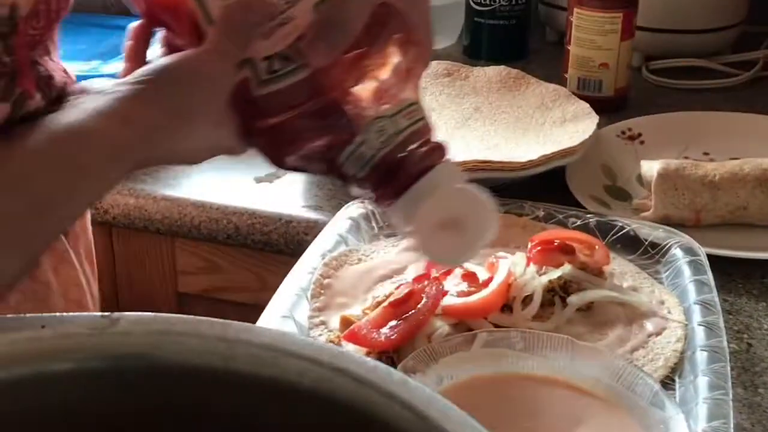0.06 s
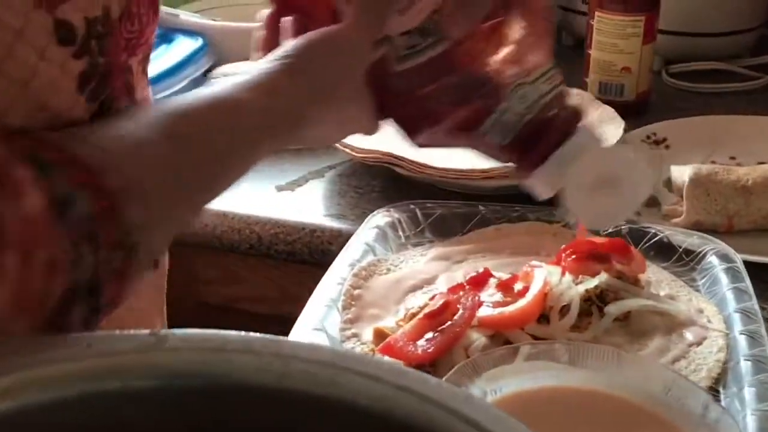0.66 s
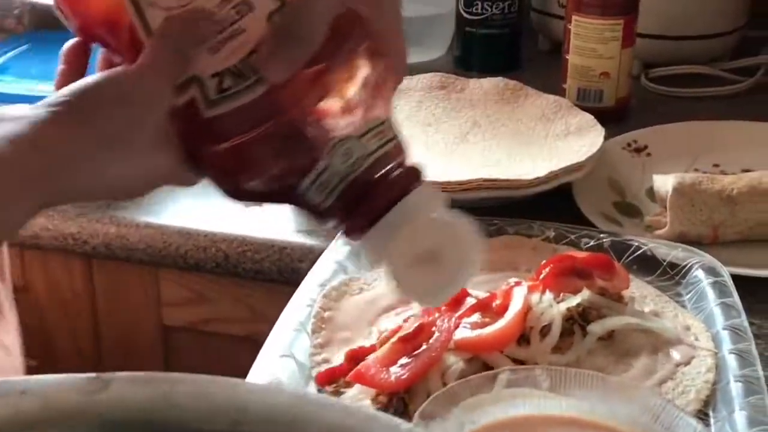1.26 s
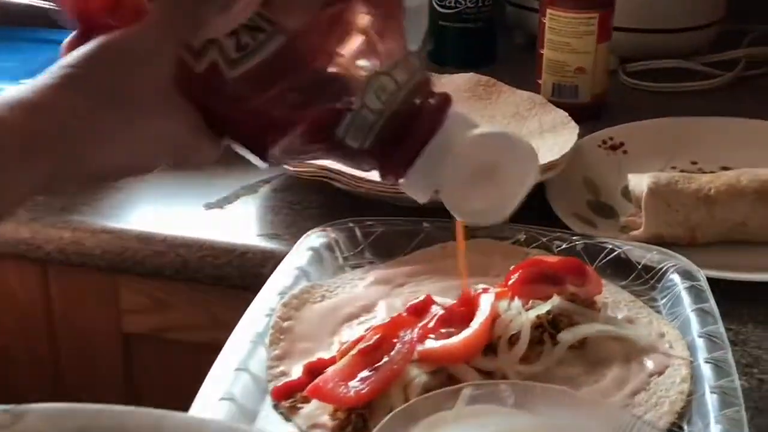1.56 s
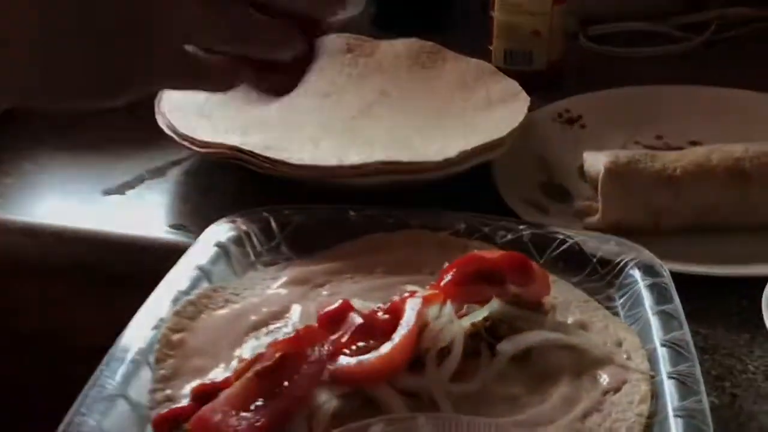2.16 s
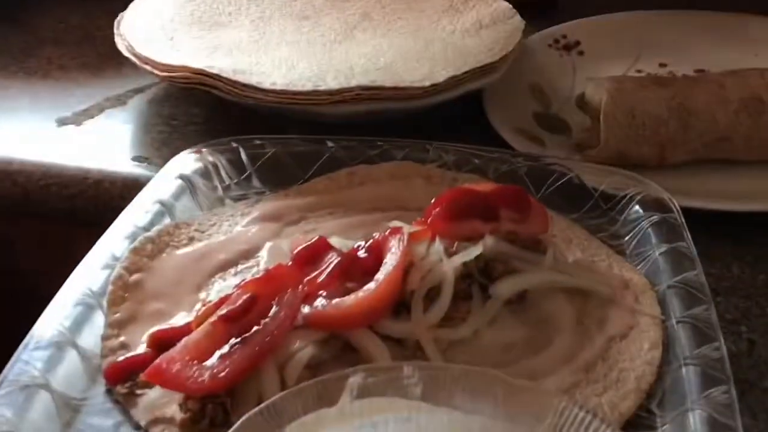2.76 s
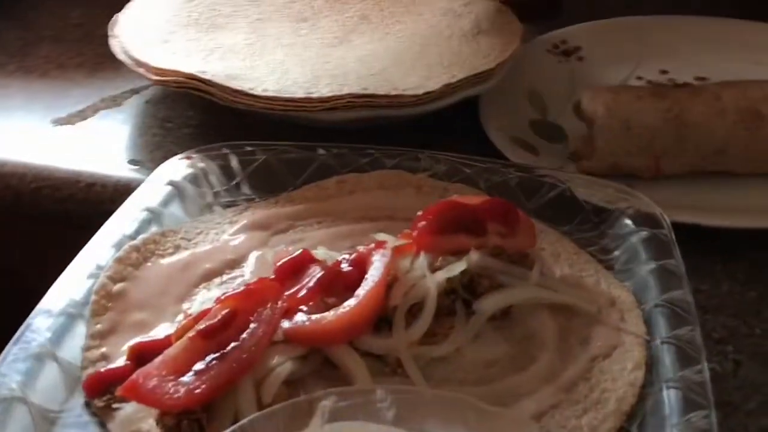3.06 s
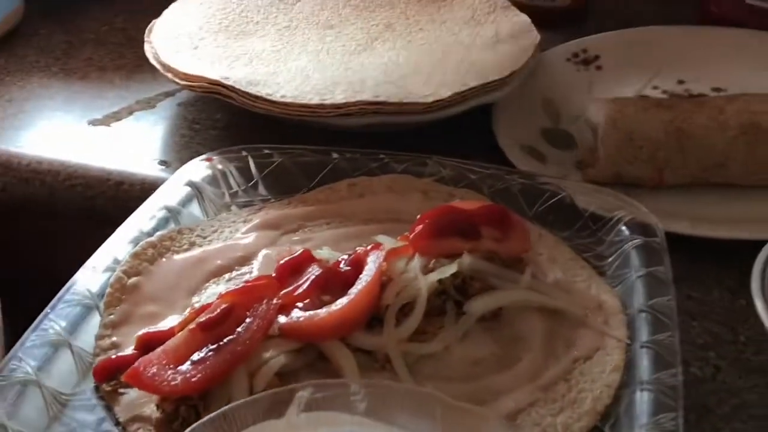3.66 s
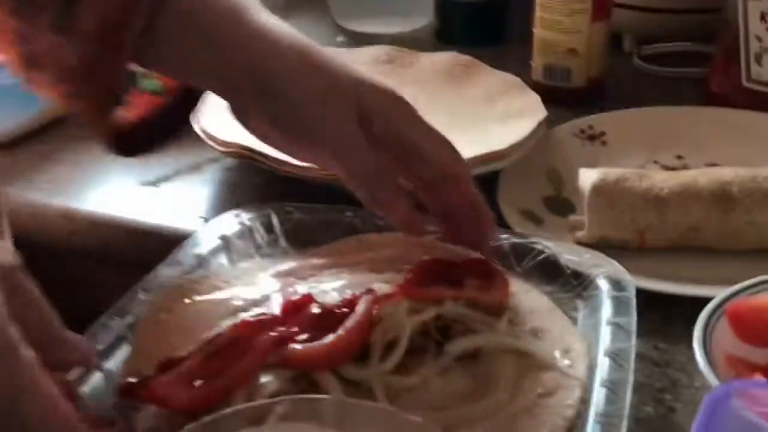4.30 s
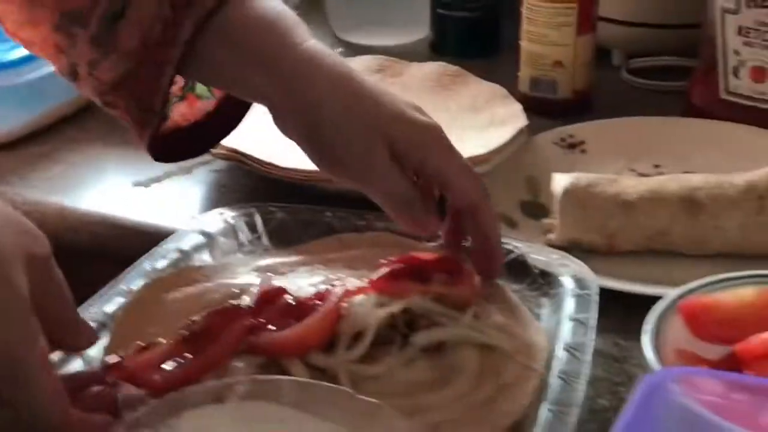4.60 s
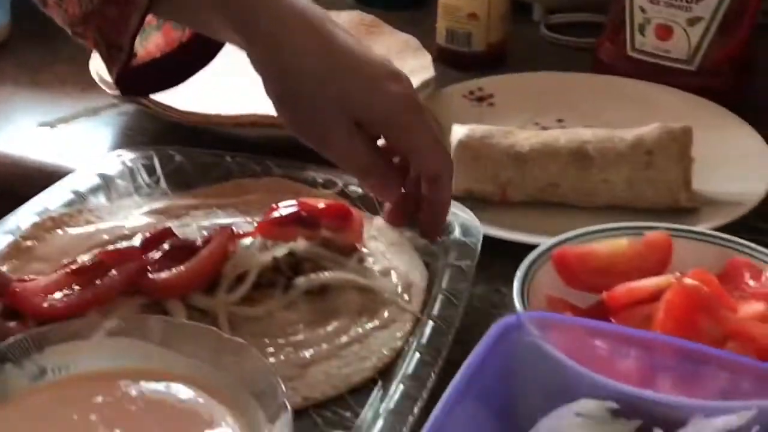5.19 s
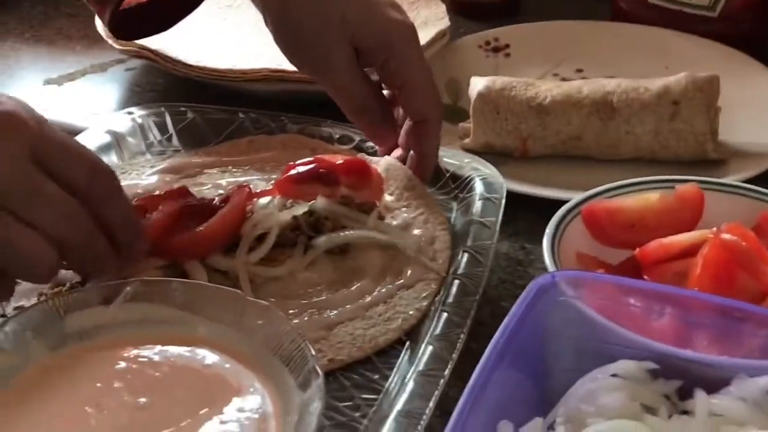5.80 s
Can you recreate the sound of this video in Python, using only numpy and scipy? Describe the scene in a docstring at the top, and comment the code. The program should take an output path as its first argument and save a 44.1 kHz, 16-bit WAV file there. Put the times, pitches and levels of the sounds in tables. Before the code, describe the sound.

Close up at a kitchen counter, an appliance hums steadily with a low rush of air. A plastic bottle squirts sauce twice, very softly, among faint clicks. The bottle is then set down with a loud, deep thump and rocks, its rim knocking as crockery clinks lightly. Afterwards fingers tap and rub on a tortilla in a thin plastic tray, and plastic snaps once, sharply.

```python
"""A kitchen counter, close up, over an appliance's motor hum and rush of air. A plastic bottle
squirts sauce twice, softly, with a faint low bump between. It is set down and rocks: the counter
booms, the rim slaps, nudged crockery clinks. Plastic clicks in the room and snaps once, hard.
Fingers tick, tap and rub on a tortilla in a thin plastic tray."""
import sys
import numpy as np
from scipy import signal
from scipy.fft import rfft, irfft
from scipy.io import wavfile
from scipy.ndimage import uniform_filter1d

SR = 44100
rng = np.random.default_rng(int(sys.argv[2]) if len(sys.argv) > 2 else 0)


def transcribe(signal):
    """Save signal, clipped to [-1, 1], as a 16-bit WAV file at the path in sys.argv[1]."""
    frames = np.atleast_2d(signal).T
    limited = np.clip(frames, -1, 1)
    pcm = np.round(limited * 32767).astype(np.int16)
    wavfile.write(sys.argv[1], SR, pcm)


N = 262174
TIME_S = np.arange(N) / SR
RING_S = TIME_S[:SR // 2]
BINS_HZ = np.maximum(np.fft.rfftfreq(len(RING_S), 1 / SR), 1)

# motor lines: (frequency [Hz], level [dB])
HUM_LINES = [(113, -66), (166.9, -64.5), (237, -75.5), (279.9, -75), (333.6, -59)]
# hum envelope: (time [s], gain [dB])
HUM_GAIN = [(0, -4), (1.2, -3), (3, 2.5), (4, 0), (5.94, 1.5)]
# appliance air: (frequency [Hz], gain [dB])
AIR_SPECTRUM = [(25, -4), (40, -2.5), (60, 10.5), (85, -6.5), (140, 2.5), (220, -12.5), (330, -8.5),
                (500, -15), (1000, -18.5), (2000, -26), (4000, -29), (8000, -35), (10300, -37),
                (15500, -37)]

# plastic clicks: (time [s], level [dB])
CLICKS = [(0.028, -56.5), (0.1351, -46), (0.832, -54.5), (0.98, -47.5), (1.719, -47.5), (1.984, -54.5),
          (2.096, -53.5), (3.72, -48.5), (4.303, -50.5), (4.325, -49), (5.242, -54), (5.7123, -44.5),
          (5.737, -55)]
# clicking plastic: (frequency [Hz], gain [dB])
CLICK_SPECTRUM = [(300, -14.5), (650, 2.5), (950, -4.5), (1300, -2.5), (1800, -5), (2600, 3.5), (3800, -4),
                  (7000, -4.5), (10300, -11), (12500, -8.5), (16000, -22.5)]
# its resonances: (frequency [Hz], width [Hz], lift [dB])
CLICK_PEAKS = [(984, 79, 11), (1190, 31, 4.5), (1860, 120, 3), (2457, 77, 1.5), (3490, 26, -2),
               (4177, 37, 11.5), (7500, 78, -33)]

# hands slip on bottle, tray and tortilla: (time [s], level [dB], centre [Hz], length [s])
RUBS = [(0.138, -76, 5650, 0.28), (1.254, -74, 1775, 0.1), (2.143, -69, 2300, 0.081),
        (4.022, -74.5, 6360, 0.31), (4.47, -69.5, 3420, 0.39), (5.773, -77, 3260, 0.13)]
# dull low bumps, and the counter's rumble after the bottle lands: (time [s], level [dB], length [s])
BUMPS = [(.25, -54.5, 0.064), (0.458, -54, 0.14), (1.04, -52.5, 0.087), (3.481, -50.5, 0.18),
         (4.299, -53.5, 0.27), (5.2, -57, 0.11)]
# sauce squirts: (time [s], length [s], hiss [dB], whistle [dB], whistle start [Hz], whistle end [Hz])
SQUIRTS = [(.46, .25, -78.5, -80, 3500, 3250), (1.555, .175, -73.5, -72, 5200, 3100)]
# nozzle and tray ticks: (time [s], level [dB], centre [Hz])
TICKS = [(.744, -62, 13500), (.798, -65, 13600), (1.3011, -67, 13000), (1.6416, -55.5, 3700),
         (5.062, -58.5, 3500), (5.4491, -53, 4100)]

# low thumps, a faint bump and then the bottle landing and rocking:
# (time [s], level [dB], pitch [ratio], first rebound [dB re thump])
THUMPS = [(1.02, -33, 1.22, 1), (3.1168, -1, 1.104, -4.5), (3.3708, -17.5, 0.834, -8),
          (3.4488, -10, 1.175, 3)]
# counter with full bottle: (frequency [Hz], gain [dB], t60 [s])
COUNTER_MODES = [(42.3, -31, 0.84), (127.4, 0, 0.11), (184, -19.5, 0.15), (231, -33, 0.19),
                 (309.4, -17.5, 0.038)]

# fingers on the tray: (time [s], level [dB], tilt [dB/octave])
TAPS = [(3.042, -50.5, -12.5), (4.1466, -50, 6), (4.4275, -44, 0), (4.9258, -39, 0)]
# thin tray: (frequency [Hz], gain [dB])
TRAY_SPECTRUM = [(200, -5.5), (500, -4.5), (1000, 1), (1500, 2.5), (2000, -4), (4200, -4.5), (5200, -13.5),
                 (8000, -18.5), (16000, -33)]
# its resonances: (frequency [Hz], width [Hz], lift [dB])
TRAY_PEAKS = [(1300, 130, 0), (1640, 93, 0.5), (2400, 81, -7), (3860, 84, 6)]

# bottle rim on the counter: (time [s], level [dB], tilt [dB/octave])
KNOCKS = [(3.1145, -35, -5.5), (3.1245, -32.5, -2), (3.141, -39, 0), (3.1675, -39.5, -1.5),
          (3.372, -37, -2), (3.4495, -29.5, -9.5), (3.464, -41, 0), (3.4855, -40.5, -4.5), (3.5, -44.5, 2)]
# knocked bottle: (frequency [Hz], gain [dB])
BOTTLE_SPECTRUM = [(120, -26), (310, 3), (470, -4.5), (680, -7), (980, -1.5), (1300, -5.5), (1800, -9),
                   (3500, -12.5), (6500, -14), (9500, -19.5), (12500, -22), (16000, -32)]
# its resonances: (frequency [Hz], width [Hz], lift [dB])
BOTTLE_PEAKS = [(490, 144, -5), (1040, 150, 0), (1830, 90, 1.5), (3480, 180, 5), (3990, 110, 6.5),
                (6800, 70, 8)]

# crockery nudges: (time [s], level [dB], pitch [ratio])
CLINKS = [(3.3717, -45, 1.0), (3.5, -46.5, .87)]
# crockery ring: (frequency [Hz], gain [dB], t60 [s])
CROCKERY_MODES = [(3360, -18, 0.071), (4086, 4, 0.031), (4996, -32, 0.22), (6460, -21, 0.075),
                  (6420, 4, 0.017), (6960, -15, 0.087), (8000, -8, 0.09), (12500, -27, .08)]

# snap and recoil: (time [s], level [dB], tilt [dB/octave])
SNAPS = [(5.624, -35.5, 0), (5.6295, -39.5, 1)]
# snapping plastic: (frequency [Hz], gain [dB])
SNAP_SPECTRUM = [(500, -10), (1000, -13), (2200, -9.5), (2700, 4), (4000, -7), (6600, -0.5), (8200, -12),
                 (12500, -8), (16000, -30)]
# its resonances: (frequency [Hz], width [Hz], lift [dB])
SNAP_PEAKS = [(2720, 300, 5.5), (3550, 53, 2), (5070, 52, 10), (6580, 150, 8.5), (8750, 120, 12)]

# room decay: (frequency [Hz], t60 [s])
ROOM_T60 = [(150, 1), (600, 0.18), (1400, 0.42), (3500, 0.2), (9000, 0.17), (16000, 0.11)]


def undb(db):
    """Decibels to gain."""
    return 10 ** (np.asarray(db) / 20)


def unit(x):
    """Scale to rms 1."""
    return x / np.sqrt(np.mean(x ** 2))


def at_hz(points, hz):
    """Interpolate (frequency [Hz], value) points on a log axis."""
    points_hz, values = np.transpose(points)
    return np.interp(np.log(hz), np.log(points_hz), values)


def add(out, time_s, x):
    """Mix x in at time_s."""
    i = max(int(time_s * SR), 0)
    out[i:i + len(x)] += x[:max(N - i, 0)]


def fade(t60_s):
    """Exponential decay."""
    return np.exp(-np.log(1000) * RING_S / t60_s)


def walk(rate_hz):
    """Smooth random drift, rms 1."""
    hold = int(SR / rate_hz)
    steps = np.repeat(rng.standard_normal(N)[:N // hold + 1], hold)
    return unit(uniform_filter1d(steps, hold)[:N])


def colour(x, gain_db):
    """Minimum-phase filter, one gain per bin of BINS_HZ."""
    cepstrum = irfft(np.log(undb(gain_db)), len(x))
    cepstrum[1:len(x) // 2] *= 2
    cepstrum[len(x) // 2 + 1:] = 0
    return irfft(rfft(x) * np.exp(rfft(cepstrum)), len(x))


def crack(shape_db, t60_s, edge, rise_s, split_hz=6000, treble_t60_ratio=0.62):
    """Sharp contact, then a dense, short ring; treble dies first."""
    noise = rng.standard_normal(len(RING_S))
    low = irfft(rfft(noise) / (1 + (BINS_HZ / split_hz) ** 4), len(RING_S))
    push = low * fade(t60_s) + (noise - low) * fade(t60_s * treble_t60_ratio)
    push *= 1 - np.exp(-RING_S / rise_s)
    push[0] += edge * np.linalg.norm(push)  # contact impulse
    ring = colour(push, shape_db)
    return ring * np.linalg.norm(fade(t60_s)) / np.linalg.norm(ring)


def blows(events, spectrum, peaks, t60_s, edge, rise_s, patchy_db):
    """Blows on one body; each blow tilts the spectrum its own way, each spot favours other small modes."""
    body = undb(at_hz(spectrum, BINS_HZ))
    for hz, width_hz, lift_db in peaks:
        body *= 1 + (undb(lift_db) - 1) / (1 + (2 * (BINS_HZ - hz) / width_hz) ** 2)
    out = np.zeros(N)
    for time_s, db, tilt_db_per_oct in events:
        spot = unit(signal.fftconvolve(rng.standard_normal(len(BINS_HZ)), np.hanning(140), "same"))
        spot_db = patchy_db * spot * np.minimum(BINS_HZ / 1000, 1)
        tilt_db = tilt_db_per_oct * np.log2(1 + BINS_HZ / 800)
        shape_db = 20 * np.log10(body) + tilt_db + spot_db
        add(out, time_s, undb(db) * crack(shape_db, t60_s, edge, rise_s))
    return out


def struck(events, modes, rise_s):
    """One set of modes, pitched per blow; soft contact builds them slowly."""
    out = np.zeros(N)
    onset = 1 - np.exp(-(RING_S / rise_s) ** 2)
    for time_s, level_db, pitch in events:
        ring = sum(undb(db) * fade(t60_s) * np.sin(2 * np.pi * hz * pitch * RING_S)
                   for hz, db, t60_s in modes)
        add(out, time_s, undb(level_db) * ring * onset)
    return out


def swell(centre_hz, width_oct, length_s, grain_db):
    """Grainy noise band that rises and dies away, rms 1."""
    n = int(length_s * SR)
    grains = (rng.standard_normal(N) * undb(grain_db * walk(250)))[:n]
    hz = np.maximum(np.fft.rfftfreq(n, 1 / SR), 1)
    band = np.exp(-(np.log2(hz / centre_hz) / width_oct) ** 2 / 2)
    return unit(irfft(rfft(grains) * band, n) * np.sqrt(np.hanning(n)))


def appliance(waver_db=2.0, drift=0.00281, air_db=-56, flutter_db=0.63):
    """Wavering motor lines over rushing air, coloured by the room's modes."""
    hum = np.zeros(N)
    for line_hz, db in HUM_LINES:
        amplitude = np.sqrt(2) * undb(db + waver_db * walk(3.33))
        drifting_hz = line_hz * (1 + drift * walk(4.906))
        hum += amplitude * np.sin(2 * np.pi * np.cumsum(drifting_hz) / SR)
    hum *= undb(np.interp(TIME_S, *np.transpose(HUM_GAIN)))
    rush = rng.standard_normal(N)
    rush += undb(-11) * room_echo(rush)
    hz = np.maximum(np.fft.rfftfreq(N, 1 / SR), 1)
    air = unit(irfft(rfft(rush) * undb(at_hz(AIR_SPECTRUM, hz)), N))
    return hum + air * undb(air_db + flutter_db * walk(9.5))


def room_echo(x, build_s=0.011):
    """Diffuse tail of a small hard room; treble dies first."""
    noise = rfft(rng.standard_normal(len(RING_S)))
    edges_hz = np.geomspace(150, 20000, 12)
    tail = np.zeros(len(RING_S))
    for lo_hz, hi_hz in zip(edges_hz, edges_hz[1:]):
        band = irfft(noise * ((BINS_HZ >= lo_hz) & (BINS_HZ < hi_hz)), len(RING_S))
        tail += band * fade(at_hz(ROOM_T60, np.sqrt(lo_hz * hi_hz)))
    tail *= 1 - np.exp(-(RING_S / build_s) ** 2)
    return signal.fftconvolve(x, tail / np.linalg.norm(tail))[:N]


def plastic_clicks(tilt_db_per_oct=1.5):
    """Plastic clicks and rings briefly; like contacts of varying strength."""
    events = [(time_s, db, tilt_db_per_oct) for time_s, db in CLICKS]
    return blows(events, CLICK_SPECTRUM, CLICK_PEAKS,
                 t60_s=0.089, edge=0.023, rise_s=0.0017, patchy_db=1.46)


def cupboards(x, db, count=8):
    """Direct sound plus early reflections off counter and cupboard doors."""
    out = x.copy()
    for lag_s, sign in zip(rng.uniform(.002, .012, count), rng.choice([-1, 1], count)):
        add(out, lag_s, sign * undb(db) * x)
    return out / np.sqrt(1 + count * undb(db) ** 2)


def hand_rubs(width_oct_per_s=1.83):
    """Gritty friction, broader the longer the stroke."""
    out = np.zeros(N)
    for time_s, db, hz, length_s in RUBS:
        add(out, time_s, undb(db) * swell(hz, width_oct_per_s * length_s, length_s, grain_db=3))
    return out


def low_bumps(centre_hz=78, width_oct=0.6):
    """Dull bumps and the counter's rumble, all in one low band."""
    out = np.zeros(N)
    for time_s, db, length_s in BUMPS:
        add(out, time_s, undb(db) * swell(centre_hz, width_oct, length_s, grain_db=2))
    return out


def sauce(flutter_hz=31, waver=.03, chirp=.14, sputter_db=3, hiss_hz=2920, hiss_oct=0.96):
    """Sauce hisses through a fluttering valve; trapped air chirps out, lower as the squeeze eases."""
    out = np.zeros(N)
    for time_s, length_s, hiss_db, whistle_db, start_hz, end_hz in SQUIRTS:
        n = int(length_s * SR)
        cycle = flutter_hz * TIME_S[:n] % 1
        puff_sweep = 2 * chirp * np.log2(start_hz / end_hz) * (.5 - cycle)
        hz = np.geomspace(start_hz, end_hz, n) * (1 + waver * walk(800)[:n] + puff_sweep)
        sputter = undb(sputter_db * walk(72)[:n])
        puffs = np.sin(np.pi * cycle) ** 2 * sputter * np.sqrt(np.hanning(n))
        whistle = unit(puffs * np.sin(2 * np.pi * np.cumsum(hz) / SR))
        add(out, time_s, undb(whistle_db) * whistle)
        add(out, time_s, undb(hiss_db) * swell(hiss_hz, hiss_oct, length_s, grain_db=4))
        add(out, time_s, undb(hiss_db + 5) * bubbles(length_s))
    return out


def bubbles(length_s, lo_hz=2300, hi_hz=8000, t60_s=.015, spread_db=10, count=16):
    """Tiny air bubbles burst at random in the stream and ring briefly."""
    out = np.zeros(N)
    for when, pitch, strength in rng.random((count, 3)):
        hz = lo_hz * (hi_hz / lo_hz) ** pitch
        ring = fade(t60_s) * np.sin(2 * np.pi * hz * RING_S)
        add(out, when * length_s, undb(spread_db * strength) * ring)
    return out


def ticks(skirt_db=11):
    """Tiny, damped snaps of nozzle and tray, each around its own pitch."""
    out = np.zeros(N)
    for time_s, db, hz in TICKS:
        shape_db = -skirt_db * np.log10(1 + (BINS_HZ / hz - hz / BINS_HZ) ** 2 / 2)
        add(out, time_s, undb(db) * crack(shape_db, t60_s=0.031, edge=0.32, rise_s=0.00024))
    return out


def low_thumps(rebounds=2, first_gap_s=0.01508, settle_db=-10, sag=0.093):
    """A faint bump of falling pitch, then the bottle landing and rocking; rebounds slow and drop."""
    contacts = []
    for time_s, db, pitch, rebound_db in THUMPS:
        contacts.append((time_s, db, pitch))
        for k in range(rebounds):
            slack = (1 - sag) ** k
            time_s += first_gap_s / slack
            contacts.append((time_s, db + rebound_db + k * settle_db, pitch * slack * (1 - sag)))
    return struck(contacts, COUNTER_MODES, rise_s=0.0045)


def tray_taps():
    """Fingers tap the thin tray into a short ring."""
    return blows(TAPS, TRAY_SPECTRUM, TRAY_PEAKS, t60_s=0.05, edge=0.09, rise_s=0.00039, patchy_db=1.5)


def rim_knocks():
    """The rim of the bottle's base slaps the counter."""
    return blows(KNOCKS, BOTTLE_SPECTRUM, BOTTLE_PEAKS,
                 t60_s=0.074, edge=0.34, rise_s=0.00057, patchy_db=2)


def crockery_clinks():
    """Nudged crockery rings in high modes."""
    return struck(CLINKS, CROCKERY_MODES, rise_s=0.00026)


def plastic_snap():
    """Plastic snaps hard and recoils."""
    return blows(SNAPS, SNAP_SPECTRUM, SNAP_PEAKS, t60_s=0.033, edge=0.25, rise_s=0.0004, patchy_db=3)


def scene():
    """Mono mix; near sounds stay mostly dry, clicks and snap carry more room."""
    boom = low_thumps()
    clatter = rim_knocks() + crockery_clinks()
    clicks = plastic_clicks()
    snap = plastic_snap()
    near = tray_taps() + sauce() + ticks() + hand_rubs() + low_bumps()
    echo = room_echo(undb(-29) * boom + undb(-11) * clatter + undb(-4) * clicks
                     + undb(-5.5) * snap + undb(-11.5) * near)
    around = cupboards(clicks + snap + echo, db=-12)
    return (boom + clatter + near + around + appliance())[None]


def record(dry):
    """The microphone cuts deep rumble and the top."""
    rumble_hz, top_hz = 32, 15900
    highpass = signal.butter(4, rumble_hz, "high", fs=SR, output="sos")
    lowpass = signal.ellip(10, .2, 80, top_hz, fs=SR, output="sos")
    return signal.sosfilt(lowpass, signal.sosfilt(highpass, dry))


dry = scene()
out = record(dry)
transcribe(out)
```